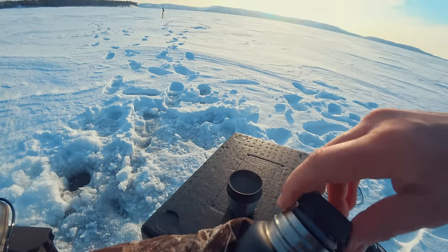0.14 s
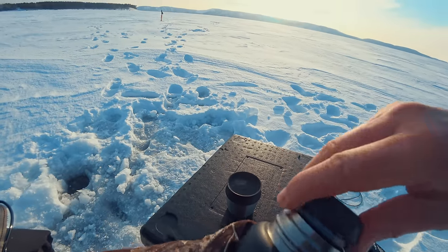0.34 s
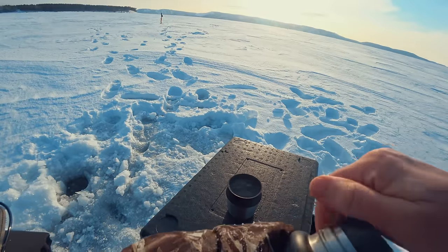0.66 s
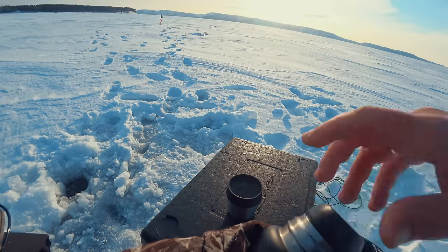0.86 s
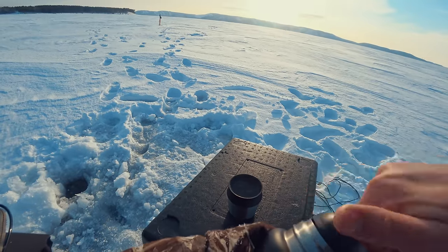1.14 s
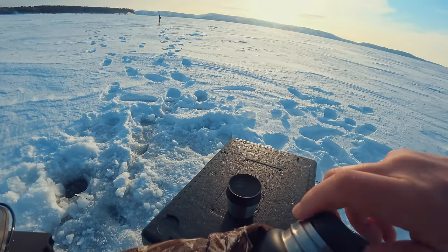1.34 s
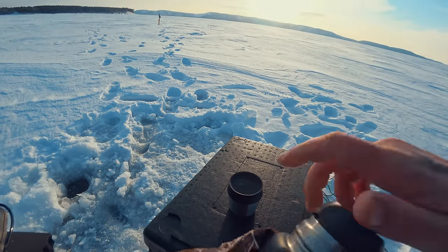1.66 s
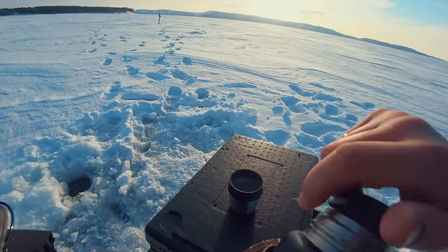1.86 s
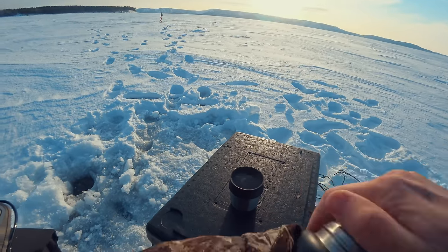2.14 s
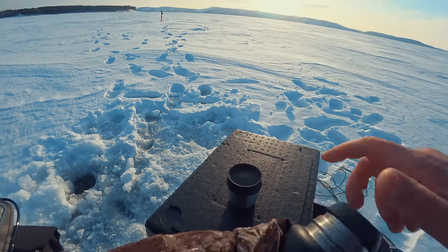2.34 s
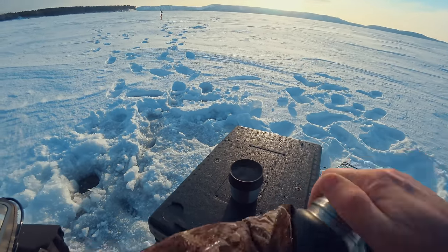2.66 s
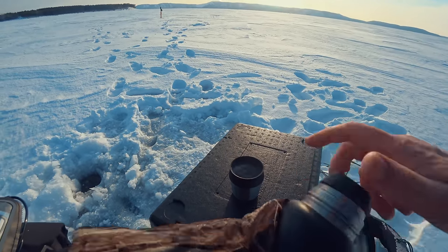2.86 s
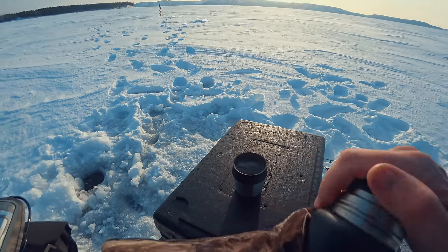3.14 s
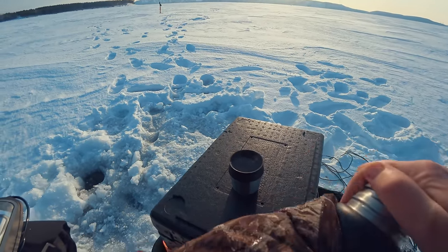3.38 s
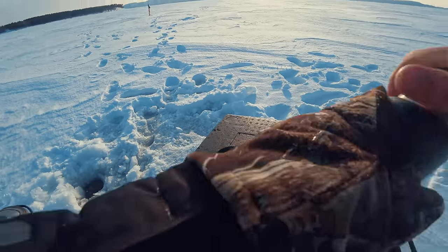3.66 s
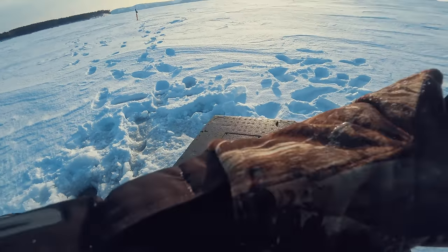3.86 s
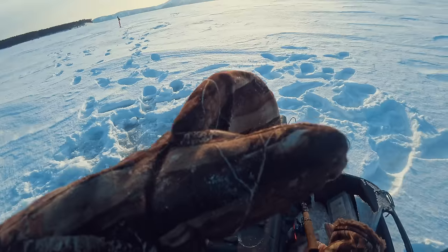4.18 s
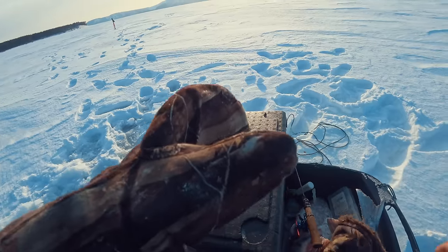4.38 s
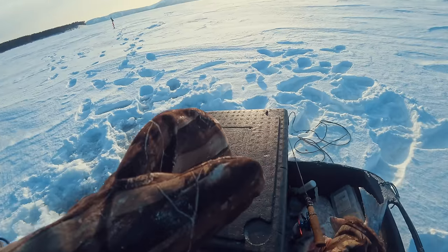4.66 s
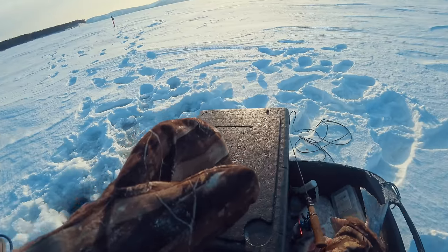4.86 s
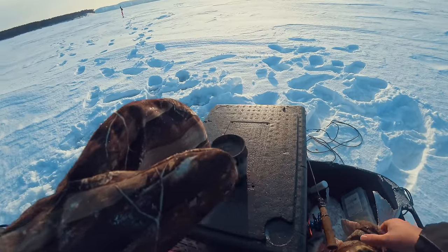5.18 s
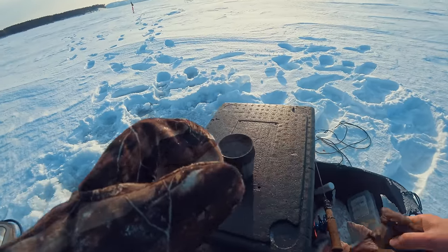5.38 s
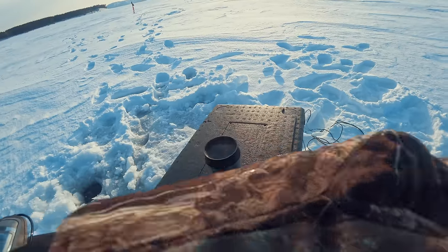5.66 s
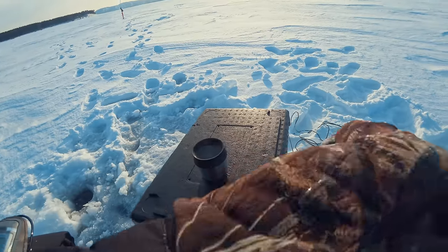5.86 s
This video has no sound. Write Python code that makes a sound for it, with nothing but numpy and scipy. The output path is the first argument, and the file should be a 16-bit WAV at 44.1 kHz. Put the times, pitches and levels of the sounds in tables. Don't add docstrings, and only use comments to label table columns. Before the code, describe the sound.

Quiet open air with a faint low wind on a close microphone. Light cloth rustle, then quick hard clicks of a cap on a metal thread, briefly ringing. Squeaky turns follow, some low, some shrill, ending in a rough, stuttering grind. Sleeves brush past, a metal base knocks and rocks on a hollow plastic lid, and nylon swishes strongly at the end. The sound is dry, with no echo.

```python
import sys
import numpy as np
from scipy import signal
from scipy.fft import rfft, irfft, next_fast_len
from scipy.io import wavfile
from scipy.ndimage import uniform_filter1d, map_coordinates

SR = 44100
rng = np.random.default_rng(int(sys.argv[2]) if len(sys.argv) > 2 else 0)


def natural_amplitude(level_db):
    exponent = np.asarray(level_db, float) / 20
    return 10 ** exponent


def dump(signal):
    limited = np.clip(np.atleast_2d(signal).T, -1, 1)
    pcm = np.round(limited * 32767).astype(np.int16)
    wavfile.write(sys.argv[1], SR, pcm)


N = 265482

# (frequency [Hz], level [dB], t60 [s])
FLASK_MODES = [(1680, -18, 0.059), (2530, -3, 0.16), (2700, -1, .06), (3000, -14, .1), (3350, 6, 0.091),
               (3410, 7.5, 0.062), (4000, -14, 0.086), (4270, -9, 0.16), (4786, -22, .15),
               (7400, -1, 0.093), (10830, -17, .1), (12000, 0, 0.037)]
# (frequency [Hz], density [dB per Hz])
CLOTH_SPECTRUM = [(71, -48), (120, -0.5), (934, -2.5), (1900, -10.5), (3200, -8.5), (6300, -23),
                  (10500, -23), (16200, -42.5)]


def unit(x):
    return x / np.sqrt(np.mean(x ** 2) + 1e-20)


def along(points, hz):
    f, v = np.transpose(points)
    return np.interp(np.log(hz + 1), np.log(f + 1), v)


def curves(rows):
    s, *cols = np.transpose(rows)
    t = np.arange(N) / SR
    return [np.interp(t, s, c) for c in cols] + [(t >= s[0]) & (t <= s[-1])]


def wobble(rate_hz):
    knots = rng.standard_normal(int(N * rate_hz / SR) + 4)
    return map_coordinates(knots, [np.arange(N) * rate_hz / SR], order=2)


def filtered(x, response):
    m = next_fast_len(x.shape[-1] + 4096)
    return irfft(rfft(x, m) * response(np.fft.rfftfreq(m, 1 / SR)), m)[..., :x.shape[-1]]


def resonances(peaks):
    return lambda f: sum((-1) ** k * natural_amplitude(db) * 1j * f * w / (c * c - f * f + 1j * f * w)
                         for k, (c, w, db) in enumerate(peaks))


def band(lo_hz, hi_hz):
    return lambda f: 1 / np.sqrt((1 + (lo_hz / (f + 1)) ** 6) * (1 + (f / hi_hz) ** 6))


def valley(hz, narrow_hz, wide_hz):
    return lambda f: (hz * hz - f * f + 1j * f * narrow_hz) / (hz * hz - f * f + 1j * f * wide_hz)


def ring(modes, t, scatter_db, bright_db=0):
    total = 0
    for hz, db, t60 in modes:
        level_db = db + bright_db * (hz > 4500) + rng.normal(0, scatter_db)
        tone = np.sin(2 * np.pi * hz * rng.normal(1, 0.0047) * t)
        beat = 1 + .7 * np.cos(rng.uniform(146, 500) * t + rng.uniform(0, 5.9))
        total = total + natural_amplitude(level_db - 60 * t / t60) * tone * beat
    return total


def blows(table, steel, hollow, edge, crack_s, knock_db, hard_db, bright_db):
    # (frequency [Hz], density [dB per Hz])
    spark_spectrum = [(2940, -42), (5000, -1.5), (6630, -9), (8060, 3), (8840, -6), (11900, -6),
                      (16000, -21)]
    # (frequency [Hz], width [Hz], level [dB])
    side_wall = [(650, 960, -2), (1207, 160, 4)]
    out, t = np.zeros(N + SR), np.arange(SR // 6) / SR
    wide = 0.039
    tick = filtered(1. * (t == 0), lambda f: resonances(edge)(f) + wide * 1j * f / (3000 + 1j * f))
    tick = natural_amplitude(-8.5) * tick / np.abs(tick).max()
    for s, db, knock, clack, steel_db in table:
        noise = rng.standard_normal((3, len(t)))
        bright = bright_db + 0.62 * db
        crack = unit(filtered(noise[0], resonances(edge)))
        crack = crack * (natural_amplitude(-11 - 60 * t / crack_s) + natural_amplitude(-15 - 60 * t / 0.0038))
        spark = unit(filtered(noise[1], lambda f: natural_amplitude(along(spark_spectrum, f))))
        spark = spark * (natural_amplitude(bright - 5 - 60 * t / 0.031) + natural_amplitude(bright + 0.8 - 60 * t / 0.007))
        body = unit(filtered(noise[2], lambda f: resonances(side_wall)(f) * band(350, 1350)(f)))
        body = body * natural_amplitude(clack - 2.0 - 60 * t / 0.046)
        thud = natural_amplitude(knock + knock_db) * ring(hollow, t, 3.27) * (1 - np.exp(-t / 0.0038))
        wall = natural_amplitude(steel_db - 23.5) * ring(steel, t, 2.9, bright + hard_db)
        out[round(s * SR):][:len(t)] += natural_amplitude(db) * (tick + crack + spark + body + thud + wall)
    return out[:N]


def rattle():
    # (time [s], peak [dB], knock [dB], clack [dB], ring [dB])
    hits = [(0.639, -26, -20, -15, -7), (0.642, -1.5, -20.5, -14, -1), (0.646, -1.5, -34, -14, -7),
            (0.649, -9, -32, -10, -4), (0.658, -13.5, -15, -9, -4), (0.678, -18, -18, -20, -2),
            (0.724, -6, -18.5, -21, -2), (0.74, -10.5, -10, -13, -19), (0.7445, -0.5, -15, -14.5, -14),
            (0.793, -1, -20, -13.5, 1.5), (0.816, -7, -20, -10, -5), (0.829, -8, -38, -15, -13),
            (0.8355, -2, -23.5, -16, -4), (0.846, -18, -20, -12, -10), (0.875, -21.5, -16, -7, -2),
            (0.97, -12, -27, -15.5, -8), (0.952, -28, -18, -18, -20), (1.018, -14.5, -18, -8.5, -9),
            (1.037, -3, -19, -12.5, -3), (1.058, -7, -16, -11, -18), (1.082, -13, -14, -13, -20),
            (1.429, -9.5, -45, -11.5, -26), (1.444, -18.5, -10.5, -26, -5), (1.626, -20, -21, -30, -12),
            (1.642, -8, -31, -14, -18), (2.023, -11.5, -16.5, -13.5, -9), (2.042, -31, -30, -25, -3)]
    # (frequency [Hz], level [dB], t60 [s])
    cap_modes = [(250, 6, 0.016), (650, 0.5, 0.029)]
    # (frequency [Hz], width [Hz], level [dB])
    thread_edge = [(2440, 710, -3), (3350, 307, 3.5), (4600, 390, -15)]
    return blows(hits, FLASK_MODES, cap_modes, thread_edge,
                 crack_s=0.027, knock_db=6.5, hard_db=19.5, bright_db=-27.5)


def slips(hz, rough, alternate, on, ratio=.5):
    hz = hz * (1 + .09 * rough * wobble(170))
    count = np.cumsum(hz * on) / SR
    k = np.arange(1, int(count[-1]) + 1)
    at = np.interp(k - .9, count, np.arange(N))
    i = at.astype(int)
    chance = rng.standard_normal((len(k), 2))
    at = at + .12 * np.abs(rough[i]) * chance[:, 0] * SR / hz[i]
    size = (1 + alternate[i] * np.cos(2 * np.pi * ratio * k)) * natural_amplitude(4 * rough[i] * chance[:, 1])
    places = np.floor(at)[:, None] + np.arange(-7, 9)
    offset = places - at[:, None]
    kernel = np.sinc(offset) * np.cos(np.pi * offset / 16) ** 2
    return np.bincount(places.astype(int).ravel(), (size[:, None] * kernel).ravel(), N)[:N]


def squeaks():
    # (time [s], slip rate [Hz], level [dB])
    turns = [
        [(1.128, 529, -62), (1.14, 498, -25), (1.148, 700, -25), (1.153, 1554, -8), (1.159, 1520, -21),
         (1.17, 1400, -36)],
        [(1.465, 721, -27), (1.468, 710, -16), (1.49, 794, -13.5), (1.498, 800, -26)],
        [(2.1065, 996, -26), (2.109, 1032, -13), (2.12, 1048, -19), (2.133, 1156, -13.5), (2.144, 1283, -11)],
        [(2.144, 1100, -13), (2.149, 1100, -16), (2.152, 1120, -5.5), (2.157, 1240, -18), (2.165, 1420, -10),
         (2.175, 1420, -15), (2.18, 1400, -20)],
        [(2.18, 776, -19.5), (2.193, 790, -20), (2.198, 798, -13), (2.212, 795, -24), (2.223, 804, -11.5),
         (2.231, 810, -13.5)],
        [(2.231, 1414, -17), (2.241, 1470, -10), (2.25, 1583, -14), (2.258, 1170, -33)],
        [(2.676, 1450, -22), (2.68, 1520, -12), (2.686, 1580, -13), (2.707, 1665, -9), (2.712, 1690, -12),
         (2.719, 1680, -8), (2.731, 1590, -12), (2.74, 1420, -13)],
        [(2.74, 1210, -13), (2.746, 1150, -15), (2.754, 1115, -21), (2.758, 1110, -32)],
    ]
    # (roughness [0-1], wobble share [0-1], wobble rate [per slip rate], treble [dB])
    grips = [(.2, .14, .5, -17), (.5, .3, .3, -23), (.15, .6, .4, -27.5), (.5, .4, .3, -26),
             (.35, .2, .37, -24), (.25, .6, .22, -26), (.11, .33, .46, -32), (.16, .2, .3, -25)]
    neck_levels_db = [-3, 2, 0, -4, -3, -6, -3.5, 9]
    # (frequency [Hz], width [Hz], level [dB])
    seal_peaks = [(2420, 240, 5.5), (2880, 260, 9), (3350, 320, 9), (4300, 280, -1.5), (5050, 250, -15),
                  (5550, 400, -8)]
    # (frequency [Hz], width [Hz], level [dB])
    neck_peaks = [(1050, 380, 0), (1560, 300, -5)]
    # (frequency [Hz], width [Hz], level [dB])
    thread_peaks = [(6300, 1100, 1), (7700, 1000, 5), (9800, 3200, 2), (12160, 220, 10)]
    falter_per_db, bite_rough, bite_s = .015, .6, .007
    t = np.arange(N) / SR
    flicker = wobble(250)
    beat, shrill, gain, low = np.zeros((4, N))
    for rows, (steady, alternate, ratio, shrill_db), neck_db in zip(turns, grips, neck_levels_db):
        hz, db, on = curves(rows)
        bite = (t < rows[0][0] + bite_s) * (rows[0][2] < -20.5)
        rough = np.clip(steady + falter_per_db * (db.max() - db) + bite_rough * bite, 0, 1)
        beat += slips(hz, rough, alternate * (1.58 + .5 * np.roll(flicker, 900)), on, ratio)
        shrill += natural_amplitude(shrill_db) * on * np.sqrt(hz / SR)
        low += natural_amplitude(neck_db) * on
        gain += natural_amplitude(db + 2.5 * rough * flicker) * on
    tone = filtered(beat, lambda f: resonances(seal_peaks)(f) * band(300, 6400)(f) ** 2)
    tone = tone - filtered(beat * low, lambda f: resonances(neck_peaks)(f) * band(500, 1900)(f))
    hiss = filtered(shrill * rng.standard_normal(N),
                    lambda f: resonances(thread_peaks)(f) * band(4800, 20000)(f))
    loudness = np.sqrt(np.abs(uniform_filter1d(tone ** 2, size=441))) + 1e-4
    return (tone * uniform_filter1d(gain, size=61) + hiss * uniform_filter1d(gain, size=181)) / loudness


def judder():
    # (time [s], slip rate [Hz], level [dB])
    last_turn = [
        (3.2685, 157.8, -9.5),
        (3.275, 154, -11),
        (3.308, 154.6, -12),
        (3.326, 187.2, -12.5),
        (3.34, 177, -14),
        (3.37, 172.4, -16.5),
        (3.385, 174, -33.5),
    ]
    # (frequency [Hz], width [Hz], level [dB])
    tight_peaks = [(600, 400, -3), (1100, 500, -2), (1900, 600, -4), (2645, 310, 5), (3060, 314, 9.5),
                   (3600, 460, 5.5), (5130, 900, -14.5)]
    t = np.arange(N) / SR
    since_s = t - last_turn[0][0]
    hz, db, on = curves(last_turn)
    beat = slips(hz, 0.358 + 0 * hz, 0 * hz, on) * natural_amplitude(db)
    rebound = 0.13 * np.roll(beat, round(0.00162 * SR)) + .5 * np.roll(beat, round(0.00201 * SR))
    burst = beat + rebound
    push = filtered(beat * natural_amplitude(-30 * np.abs(since_s)),
                    resonances([(156, 22, 24.5), (600, 130, 29.4), (1100, 910, 3.1)]))
    grind = unit(filtered(rng.standard_normal(N) * natural_amplitude(3.1 * wobble(400)), resonances(tight_peaks)))
    grind = grind * natural_amplitude(db - 6) * on * np.clip(since_s / 0.042, 0, 1)
    grind += natural_amplitude(-11) * filtered(burst, resonances([(7500, 1200, 10.0), (12300, 1500, -13)]))
    tight = filtered(burst, lambda f: resonances(tight_peaks)(f) * band(300, 6000)(f))
    return natural_amplitude(24.5) * tight + filtered(push, band(60, 2500)) + filtered(grind, band(200, 14000))


def seal():
    rubber = squeaks() + judder()
    steel = [(hz, 0.78 / t60, db) for hz, db, t60 in FLASK_MODES]
    return rubber + natural_amplitude(-16.0) * filtered(rubber, resonances(steel))


def bell():
    # (time [s], frequency [Hz], level [dB], drift [Hz/s], t60 [s])
    hums = [(.644, 3400, -20, 0, .08), (.665, 1696, -36, 0, .1), (.655, 4235, -34, 0, .12),
            (.724, 3340, -21, 0, .06), (.752, 2700, -32, 0, .1), (.793, 3350, -21, 0, .08),
            (.836, 3340, -22, 0, .12), (.836, 2460, -29, 0, .18), (.84, 4000, -34, 0, .14),
            (.836, 7320, -39, 0, .1), (.97, 3340, -28, 0, .08), (1.037, 3400, -23, 0, .06),
            (1.155, 12250, -38, 0, .06), (1.497, 2700, -38, 0, .15), (.65, 826, -30, 0, .9),
            (.795, 838, -33, -40, .5), (1.037, 825, -46, 0, .8), (1.47, 815, -37, 350, .4),
            (1.627, 3350, -32, 0, .12), (1.645, 1700, -34, 0, .05), (1.643, 845, -33, -330, .3),
            (2.918, 805, -38, 600, .5), (1.497, 3380, -36, 0, .3), (1.16, 3390, -40, 0, .35),
            (2.262, 3580, -32, 300, .15), (4.7, 3030, -47, 0, 1.5), (4.95, 1480, -30, 0, .1),
            (4.99, 3010, -44, 0, 1.2), (4.95, 3900, -44, 0, .4), (5.055, 3900, -40, 0, .22),
            (5.915, 2495, -29, 600, .2)]
    rise_s, held_s = 0.0044, 0.18
    out, t = np.zeros(N + SR), np.arange(round(held_s * SR)) / SR
    shape = (1 - np.exp(-t / rise_s)) * np.minimum(1, (held_s - t) / 0.043)
    shake = np.tile(wobble(130), 2)
    for s, hz, db, drift, t60 in hums:
        shake_db = 4.5 * (hz > 2000) * shake[round(s * SR + hz):][:len(t)]
        tone = np.sin(2 * np.pi * (hz + drift * t / 2) * t)
        out[round(s * SR):][:len(t)] += np.sqrt(2) * natural_amplitude(db - 60 * t / t60 + shake_db) * shape * tone
    return out[:N] * natural_amplitude(0.7 * wobble(40))


def set_down():
    # (time [s], peak [dB], knock [dB], clack [dB], ring [dB])
    hits = [(4.69, -7.5, -10, -10.5, -6), (4.695, 0.5, -31, -16.5, -3), (4.705, -10, -3.5, -7, 0),
            (4.812, -24, -14, -15, 4), (4.862, -30, -18, -20, 16.5), (4.897, -19.5, -10, -19, 11.5),
            (4.913, -21, -25, -17, 3), (4.949, -13, 0.5, -10, -13), (4.957, -5, -18.5, -34, -31),
            (4.991, -14.5, 0, -7.5, 4), (4.996, -12.5, -14, -14, 5.5), (5.01, -22, -20, -20, 2),
            (5.032, -11.5, -12, -14, 6), (5.051, -4, -9, -10, -11), (5.061, -12.5, -2, -9, 3),
            (5.079, -11.5, -4.5, -16, -4)]
    # (frequency [Hz], level [dB], t60 [s])
    base_modes = [(1450, -12, 0.13), (2970, -3.5, 0.24), (3230, -9, .15), (3910, -8, 0.25),
                  (4520, -15, 0.2), (5300, -20, .2), (5650, -18.5, .25), (6260, -17.5, .2),
                  (7400, -16, 0.19), (8060, -9.5, .2), (8300, -20, 0.15), (9700, -7, 0.12),
                  (10700, -15.5, .14), (11160, -11, 0.11)]
    # (frequency [Hz], level [dB], t60 [s])
    lid_modes = [(97, -12, 0.11), (196.7, -3, 0.092), (240, -5, 0.073), (289, -6.5, 0.09),
                 (375, -8.5, 0.046), (571, -8, 0.052)]
    # (frequency [Hz], width [Hz], level [dB])
    base_edge = [(1500, 630, -2.5), (3120, 710, 0), (3840, 570, -2.5)]
    return blows(hits, base_modes, lid_modes, base_edge,
                 crack_s=0.034, knock_db=3.0, hard_db=18.0, bright_db=-15.0)


def taps():
    # (time [s], peak [dB], pitch [Hz], brightness [dB])
    touches = [(0.087, -42.5, 570, -19), (0.301, -40.5, 670, -24), (1.343, -36.5, 1300, -27),
               (1.759, -27, 600, -26), (1.845, -26.5, 930, -21), (1.923, -17, 1300, -26),
               (1.936, -9.5, 1350, -34), (1.947, -11.5, 1210, -32), (1.979, -23, 1070, -21),
               (2.063, -29.5, 700, -22), (2.918, -27, 807, -22.5), (3.386, -47, 3000, 3),
               (3.49, -27.5, 650, -25), (3.539, -28.5, 1500, -12), (3.571, -27, 970, -13),
               (3.845, -30, 920, -22), (3.87, -41, 694, -20), (4.224, -33, 1200, -17.5),
               (4.363, -38, 1500, -17), (4.033, -26.5, 600, -22), (4.316, -33, 1070, -44.5),
               (5.181, -26.5, 980, -32), (5.258, -35.5, 450, -31), (5.415, -44.5, 453, 0),
               (5.456, -37, 915, -0.5), (5.461, -43, 1800, 1), (5.464, -46, 1800, -1),
               (5.682, -24, 1300, -17.5), (5.73, -25, 795, -20), (5.915, -25, 910, -24)]
    out, t = np.zeros(N + SR), np.arange(SR // 20) / SR
    fizz_shape = lambda f: natural_amplitude(along(CLOTH_SPECTRUM, f)) * band(1500, 20000)(f) * (f / 3000) ** 0.36
    for s, db, hz, bright in touches:
        note = np.sin(2 * np.pi * hz * t) * natural_amplitude(4.5 - 60 * t * hz / 14) * (1 - np.exp(-t / 0.00011))
        fizz = unit(filtered(rng.standard_normal(len(t)), fizz_shape))
        out[round(s * SR):][:len(t)] += natural_amplitude(db) * (note + fizz * natural_amplitude(bright + 12.5 - 60 * t / 0.017))
    return out[:N]


def scrape():
    # (time [s], length [s], level [dB], frequency [Hz], width [Hz])
    strokes = [
        (1.912, 0.078, -24, 1500, 1300),
        (2.217, 0.011, -28.5, 422, 180),
        (1.135, 0.017, -31, 630, 105),
        (2.54, 0.055, -42, 600, 150),
        (2.51, 0.12, -44, 2700, 80),
        (2.52, 0.11, -46, 640, 62),
        (2.3, 0.081, -46.5, 3200, 69),
        (4.86, .07, -36, 3100, 500),
        (5.78, 0.085, -30.5, 2480, 130),
        (5.73, 0.11, -29.5, 900, 230),
    ]
    out = np.zeros(N + SR)
    grains = rng.standard_normal(N + SR) * np.pad(natural_amplitude(1.3 * wobble(200)), (0, SR))
    t = np.arange(SR // 5) / SR
    for s, length, db, hz, width_hz in strokes:
        start = round((s - .01) * SR)
        slow = filtered(grains[start:][:len(t)], lambda f: 1 / (1 + 1.3j * f / width_hz) ** 2)
        swell = np.interp(t, [0, 0.011 + 0.29 * length, length + 0.024], [0, 1, 0])
        out[start:][:len(t)] += unit(slow * np.cos(2 * np.pi * hz * t)) * natural_amplitude(db) * swell
    return out[:N]


def rush(shape, patchy_db, grain_db):
    # (frequency [Hz], left-right likeness [0-1])
    likeness = [(60, 1.0), (150, 0.97), (380, 0.94), (950, 0.79), (2380, 0.9), (5980, 0.75), (15000, 0.56)]
    white = rng.standard_normal((2, N)) * natural_amplitude(grain_db * wobble(700))
    z = signal.stft(white, nperseg=512)[2]
    field = uniform_filter1d(rng.standard_normal(z.shape[1:]), size=6, axis=0)
    field = uniform_filter1d(field, size=8, axis=1)
    pair = signal.istft(z * natural_amplitude(patchy_db * unit(field)), nperseg=512)[1][:, :N]
    turn = lambda hz: np.arccos(np.clip(along(likeness, hz), -1, 1)) / 2
    mid, side = filtered(pair, lambda hz: shape(hz) * [np.cos(turn(hz)), np.sin(turn(hz))])
    return unit(np.array([mid + side, mid - side]))


def jacket():
    # (time of fastest motion [s], level [dB], time to gain 10 dB [s], time to lose 10 dB [s], brightness [dB])
    strokes = [(0, -49, .1, 0.22, 1.5), (0.389, -47.5, 0.16, 0.74, 3), (.72, -39.5, 0.04, 0.17, -6.5),
               (1.05, -51.5, 0.04, 0.44, -9), (1.17, -46, 0.2, 0, 3.5), (1.54, -42.5, 0.08, 0.08, 4.5),
               (1.87, -40, 0.16, 0.15, 2), (1.929, -35, 0, 0.09, 2), (1.979, -37, 0.0263, 0.07, 3),
               (2.05, -42.5, 0.22, 0.2, -1), (2.269, -38.5, 0.15, 0.05, 0.5), (2.4, -52.5, 0.7, 0.5, 0.5),
               (2.57, -41, 0.15, 0.46, -2), (2.78, -46.5, 0.2, 0.17, 3), (2.99, -44.5, 0.34, 0.3, 2.5),
               (3.4, -41, 0.17, 0.36, 0), (3.569, -34, 0.14, 0.3, 3.5), (3.78, -37, 0.37, 0.03, 4),
               (3.86, -57, 1, -1, -4), (4.0, -41.5, .06, 0.2, 3.5), (4.15, -41.5, 0.1, 0.09, 0.5),
               (4.32, -47.5, 0.8, -0.06, -8.5), (4.53, -43.5, 0.28, 0.2, 1.5), (4.91, -41, 0.15, 0.1, 3),
               (5.14, -45, 0.63, 0.8, -4.5), (5.39, -42.5, 0.22, 0.16, 2.5),
               (5.674, -33.5, 0.0153, -0.13, 2.5), (5.769, -29.5, 0.1062, 0.05, 2.5),
               (5.9, -33, 0.22, 0.3, 0.5), (6, -36.5, 0.07, .3, 0)]
    # (frequency [Hz], narrow width [Hz], wide width [Hz])
    port_dips = [(5700, 1620, 2140), (9500, 1040, 1200)]
    s, db, rise, fall, bright_db = np.transpose(strokes)[..., None]
    coarse = np.arange(0, N, 64)
    late = coarse / SR - s
    stroke_db = db - 10 * np.where(late < 0, -late / np.abs(rise), late / np.abs(fall))
    flutter = wobble(30)

    def level(shift_db):
        return np.interp(np.arange(N), coarse, np.sqrt(np.sum(natural_amplitude(stroke_db + shift_db) ** 2, axis=0)))

    def cloth(lo_hz, hi_hz):
        return lambda hz: natural_amplitude(along(CLOTH_SPECTRUM, hz)) * band(lo_hz, hi_hz)(hz)

    def hiss_shape(hz):
        return cloth(4500, 20000)(hz) * np.abs(valley(*port_dips[0])(hz) * valley(*port_dips[1])(hz))

    rub = rush(cloth(181, 1010), patchy_db=1.8, grain_db=2.0)
    rub = level(-1 - 0.57 * bright_db) * natural_amplitude(2.16 * flutter) * rub
    swish = level(0) * natural_amplitude(1.34 * flutter) * rush(cloth(1634, 3380), patchy_db=1.5, grain_db=2.0)
    hiss = level(-7 + bright_db) * natural_amplitude(.7 * flutter) * rush(hiss_shape, patchy_db=1.2, grain_db=1.5)
    return rub + swish + hiss


def wind():
    # (time [s], level [dB])
    strength = [
        (0, -49.5),
        (6.02, -46.5),
    ]
    # (frequency [Hz], density [dB per Hz])
    gust_spectrum = [(8.8, -49), (15, -3), (40, -3.5), (108, -8.5), (188, -16.5), (250, -19.5), (320, -57),
                     (550, -120)]
    air = rush(lambda hz: natural_amplitude(along(gust_spectrum, hz)), patchy_db=1.0, grain_db=2.0)
    return natural_amplitude(curves(strength)[0] + 0.89 * wobble(6.4)) * air


def scene():
    # (time [s], left minus right [dB])
    balance = [
        (0, .3),
        (3.3, -.3),
        (3.6, 2),
        (4.4, 1.5),
        (4.7, .3),
        (6.02, 1),
    ]
    # (frequency [Hz], level [dB])
    scatter_db = [(200, -24), (1000, -16), (3000, -18), (10000, -6), (13000, -2)]
    hard = rattle() + seal() + bell() + set_down() + taps() + scrape()
    scatter = rng.standard_normal(121) * np.hanning(121)
    scatter = scatter - scatter[::-1]
    side = signal.fftconvolve(hard, scatter / np.linalg.norm(scatter), "same")
    side = filtered(side, lambda hz: natural_amplitude(along(scatter_db, hz)))
    lean = curves(balance)[0]
    near = np.array([hard + side, hard - side]) + jacket()
    return near * natural_amplitude([lean / 2, -lean / 2]) + wind()


def top_cut(x):
    return signal.sosfilt(signal.butter(12, 16520, fs=SR, output="sos"), x)


def record(dry):
    top_hz = 15900
    dry = filtered(dry, lambda hz: 1 / np.sqrt(1 + (hz / top_hz) ** 120))
    held = dry / (1 + np.abs(dry / .95) ** 5) ** (1 / 5)
    return top_cut(held)


dry = scene()
out = record(dry)
dump(out)
```